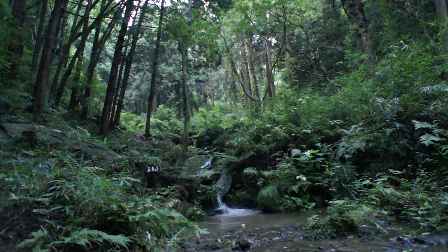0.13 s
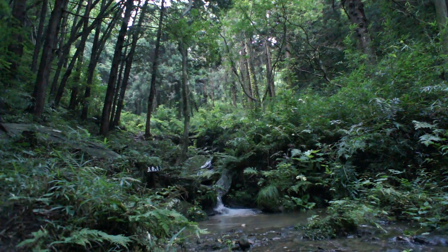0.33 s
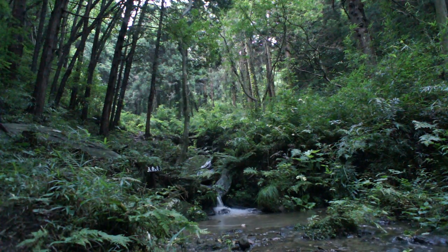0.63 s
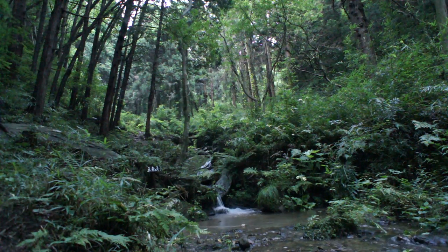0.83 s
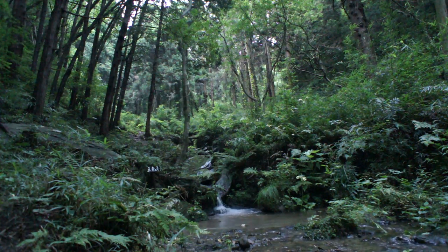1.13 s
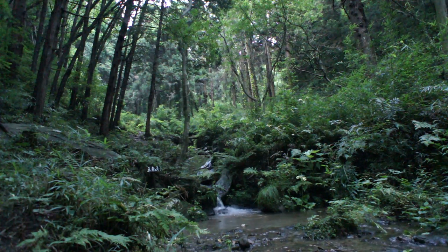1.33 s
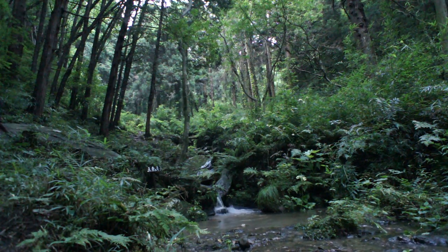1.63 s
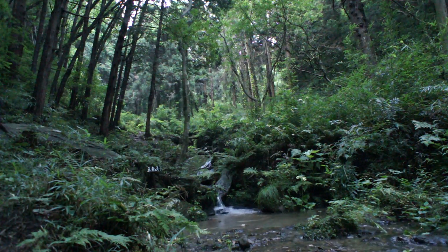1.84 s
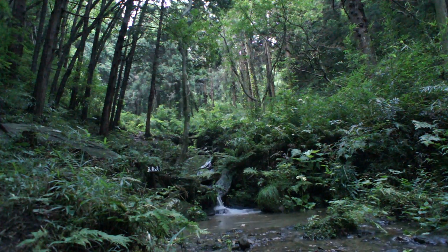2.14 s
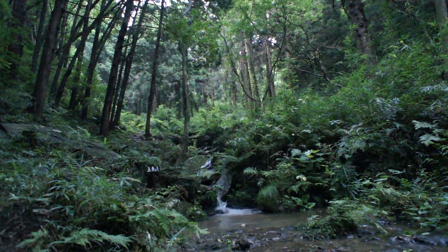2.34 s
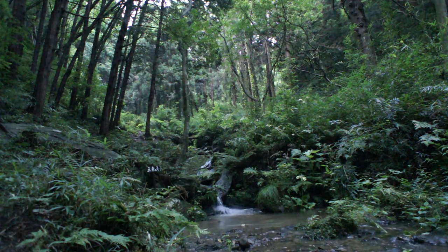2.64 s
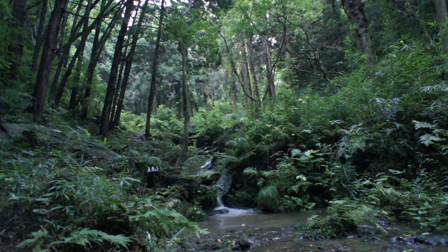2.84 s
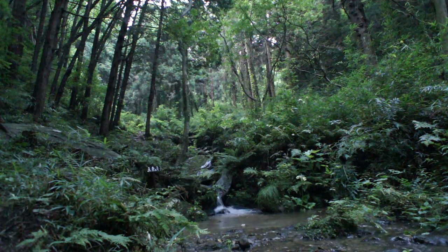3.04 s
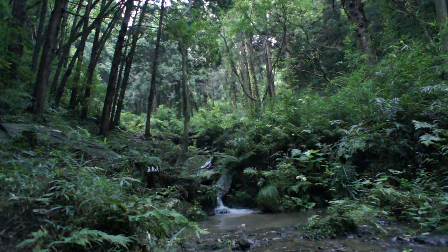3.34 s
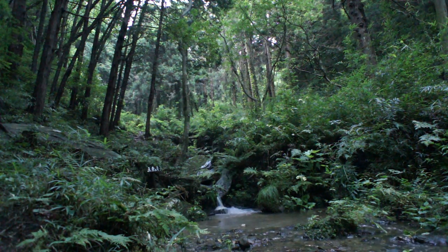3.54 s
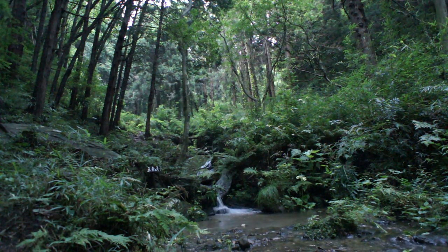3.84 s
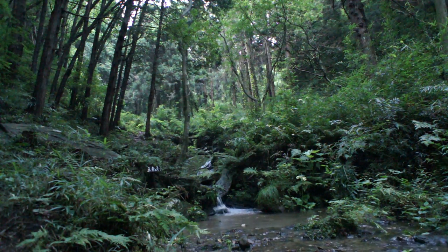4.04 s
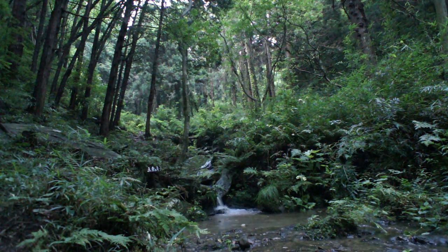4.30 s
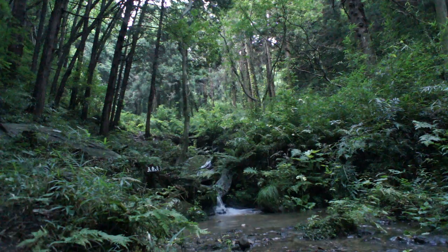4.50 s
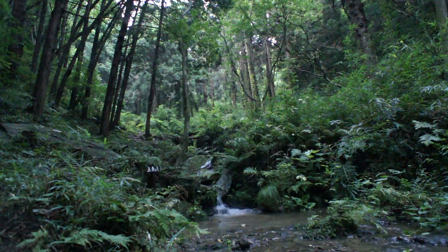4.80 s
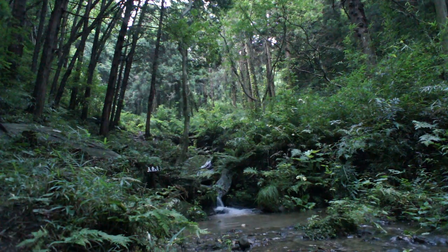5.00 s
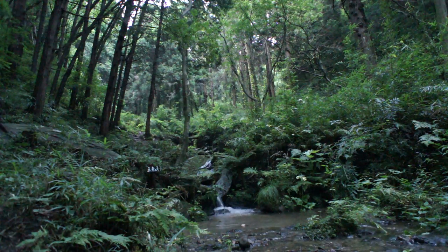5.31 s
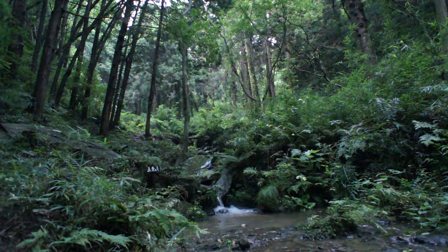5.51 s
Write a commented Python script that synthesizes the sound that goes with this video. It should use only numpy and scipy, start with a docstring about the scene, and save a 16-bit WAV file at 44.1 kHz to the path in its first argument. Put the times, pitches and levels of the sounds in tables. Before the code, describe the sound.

Overlapping high metallic cicada trills fade, then surge louder in a wooded ravine, above steady stream rush and occasional watery plops.

```python
"""Evening cicadas chirp in a forest ravine, over a small waterfall that drops into a pool.
Seven near ones each repeat a ringing harmonic note, most about seven times a second, slowing as they tire;
behind them a far chorus swells and the farthest insects blur into filtered noise with thin trills.
The trunks scatter the chirps as dense random echoes. The water is an even rush of shaped noise, with
bubbles that ring as decaying, rising sines and plops that add a short splash of noise."""
import sys
import numpy as np
from scipy import signal
from scipy.fft import rfft, irfft
from scipy.io import wavfile
from scipy.ndimage import uniform_filter1d

SR = 44100
rng = np.random.default_rng(int(sys.argv[2]) if len(sys.argv) > 2 else 0)


def wav_record(signal):
    """Record a signal, one row per channel, as 16-bit PCM in the file named by sys.argv[1]."""
    frames = np.transpose(np.atleast_2d(signal))
    bounded = np.clip(frames, -1, 1)
    # unit amplitude maps onto the largest positive 16-bit level
    quanta = np.round(bounded * 32767).astype(np.int16)
    wavfile.write(sys.argv[1], SR, quanta)


N = 249606
TIME = np.arange(N) / SR


def gain_of(db):
    """Amplitude ratio: 20 dB is a factor of ten."""
    return 10 ** (np.asarray(db) / 20)


def evened(x):
    """Normalization of power: scales to rms 1."""
    return x / np.sqrt(np.mean(x ** 2) + 1e-20)


def read(points, hz):
    """Interpolation of a spectrum along a logarithmic frequency axis."""
    f, value = np.transpose(points)
    return np.interp(np.log(hz + 1), np.log(f + 1), value)


def level(points):
    """Amplitude envelope: a curve of dB over time as a gain for every sample."""
    return gain_of(np.interp(TIME, *np.transpose(points)))


def add(mix, s, sound):
    """Superposition: adds a sound into the mix from time s on, cut at the ends of the mix."""
    start = round(s * SR)
    sound = sound[..., max(-start, 0):]
    part = mix[..., max(start, 0):][..., :sound.shape[-1]]
    part += sound[..., :part.shape[-1]]


def wander(t, rate):
    """Random modulation: straight lines between random values, rate of them a second."""
    return np.interp((t - t[0]) * rate, np.arange(8192), rng.standard_normal(8192))


def place(x, side_db, delay_ms):
    """Stereo localization: a point source differs in level and arrival time at two microphones."""
    left = np.roll(x, round(delay_ms * SR / 1000)) * gain_of(side_db / 2)
    right = x / gain_of(side_db / 2)
    return np.array([left, right])


def noise(spectrum, likeness, patchy_db, flicker_db):
    """Partly coherent stereo noise, its level modulated in small patches and over wide bands."""
    hop, window = 256, 1024
    frames, hz = N // hop + 5, np.fft.rfftfreq(window, 1 / SR)
    a, b, c, d, patches, flicker = rng.standard_normal((6, frames, len(hz)))
    patches = uniform_filter1d(patches, size=9, axis=0)  # over time
    patches = evened(uniform_filter1d(patches, size=8, axis=1))  # over frequency
    flicker = uniform_filter1d(flicker, size=2, axis=0)
    flicker = evened(uniform_filter1d(flicker, size=60, axis=1))
    same = np.clip(read(likeness, hz), -1, 1)
    left, other = a + 1j * b, c + 1j * d
    right = same * left + np.sqrt(1 - same ** 2) * other
    gain = gain_of(read(spectrum, hz) + patchy_db * patches + flicker_db * flicker)
    z = np.array([left, right]) * gain
    sound = signal.istft(z.swapaxes(1, 2), nperseg=window, noverlap=window - hop)[1]
    return evened(sound[:, :N])


def forest(x, t60, early_s, late_db):
    """Multiple scattering: near trunks echo at once, far ones leave a faint tail, unlike at each ear."""
    t = TIME[:SR]
    taps = rng.standard_normal((2, SR)) * (rng.random((2, SR)) < 3000 / SR)  # 3000 echoes per s
    early = np.exp(-t / early_s)
    late = gain_of(late_db - 60 * t / t60)
    taps *= early + late
    taps /= np.linalg.norm(taps, axis=1, keepdims=True)
    return signal.fftconvolve(np.atleast_2d(x), taps, axes=1)[:, :x.shape[-1]]


def deep_wood():
    """Incoherent summation: the farthest insects merge into a noise band with a few thin steady trills."""
    # Blur of countless cicadas. Each row: frequency in Hz, relative density in dB per Hz.
    blur = [(3400, -22), (3950, -0.5), (4300, -0.5), (4800, -15.5), (5600, -12), (6400, -8), (6900, -10.5),
            (7700, -4), (8050, 1.5), (8550, 3.5), (9050, -6.5), (9600, -15), (10500, -4), (11600, -51)]
    # Its level. Each row: time in seconds, level in dB.
    blur_level = [(0, -24), (.6, -23.5), (1.9, -26), (2.8, -25.5), (3.8, -24), (4.7, -22), (5.66, -22.5)]
    # Trills of other insects. Each row: frequency in Hz, width at half amplitude in Hz, level in dB.
    trill_bands = [(7142, 50, -55), (7466, 18, -51), (7585, 30, -48), (7660, 60, -49), (7910, 45, -45)]
    hz = np.fft.rfftfreq(N, 1 / SR)
    z = rfft(rng.standard_normal((2, N)))
    trills = np.zeros((2, N))
    for f, width, db in trill_bands:
        resonance = 1 / (1 + (2 * (hz - f) / width) ** 2)
        trills += gain_of(db) * evened(irfft(z * resonance, N))
    unlike = [(1000, 0)]  # no likeness of left and right at any frequency
    return trills + level(blur_level) * noise(blur, unlike, patchy_db=2.0, flicker_db=1.0)


def tymbal(t, hz, harmonics_db, jitter, buzz, click_hz):
    """Driven resonance: the abdomen rings in harmonics, kept going by the uneven buckling of its ribs."""
    phase = 2 * np.pi * np.cumsum(hz * (1 + jitter * wander(t, 700))) / SR
    click_phase = 2 * np.pi * np.cumsum(click_hz * (1 + .25 * wander(t, 150))) / SR
    ribs = 1 + buzz * np.cos(click_phase)
    phase = (phase % (2 * np.pi)).astype(np.float32)
    ring = sum(float(gain_of(db)) * np.sin((k + 1) * phase) for k, db in enumerate(harmonics_db))
    return evened(ribs * ring)


def far_chorus(count=18):
    """Asynchronous superposition: each cicada has its own pitch and tempo, heard only through the trees."""
    # Swell of the chorus. Each row: time in seconds, level in dB before the trim.
    swell = [(0.1, -24.5), (1.95, -30.5), (3.94, -24.5), (4.14, -22.5), (5.58, -22.5), (5.6, -21.5)]
    # Timbre of one voice: the relative levels of harmonics 1 to 5 in dB.
    voice_harmonics = [-9, -3, -13, -15.5, -16]
    trim_db = 1.73
    t = np.arange(N + SR // 2) / SR  # half a second of lead-in lets the echoes build up
    groups = np.zeros((3, len(t)))
    for k in range(count):
        spread = 2 * (k + rng.random()) / count - 1  # place within the range of pitches, -1 to 1
        tempo = rng.uniform(6.3, 7.9) * (1 + .05 * wander(t, 1))  # chirps per s
        beat = np.cumsum(tempo) / SR + rng.random()
        pull = np.maximum(np.sin((2 * np.pi * beat).astype(np.float32)), 0)
        hz = (2122 + 138 * spread) * (1 + .006 * wander(t, 1.5) + .014 * (pull - .8))
        song = tymbal(t, hz, voice_harmonics, jitter=0.00819, buzz=0.3, click_hz=220.2)
        groups[k % len(groups)] += gain_of(-7 * spread ** 2) * pull * song
    heard = sum(forest(group, t60=2.0, early_s=0.027, late_db=-11) for group in groups)
    return gain_of(trim_db) * level(swell) * evened(heard[:, -N:])


def bubble(hz, t60, rise):
    """Volume resonance: a trapped pocket of air rings and climbs in pitch as it nears the surface."""
    t = np.arange(0, t60, 1 / SR)
    onset = 1 - np.exp(-t * hz / 1.04)
    return gain_of(-60 * t / t60) * onset * np.sin(2 * np.pi * hz * (t + rise * t ** 2 / t60))


def splash(hz, t60, length=0.061):
    """Band-passed noise burst: the wet slap around and above a bubble's pitch as water closes over it."""
    t = np.arange(0, length, 1 / SR)
    band = signal.butter(2, [0.61 * hz, 1.95 * hz], "band", fs=SR, output="sos")
    spray = signal.sosfilt(band, rng.standard_normal(len(t)))
    return evened(spray) * (1 - np.exp(-t / 0.0025)) * gain_of(-60 * t / t60)


def lesser_plops(count=30):
    """Chance excitation: middling bubbles, one at a random moment in each slot, as (s, Hz, dB, t60 s)."""
    per_s, low_hz, high_hz = 5, 482, 987
    middle_db, spread_db = -26, 0.5
    cycles = 46  # each rings for this many cycles
    when, size, force = rng.random((count, 3)).T
    s = (np.arange(count) + when) / per_s
    hz = low_hz * (high_hz / low_hz) ** size
    db = middle_db + spread_db * (2 * force - 1)
    return list(np.transpose([s, hz, db, cycles / hz])[s < N / SR])


def waterfall(count=36):
    """Turbulence and bubble resonance: an even rush, small bubbles all the time, and single plops."""
    # Spectrum of the falling water. Each row: frequency in Hz, relative density in dB per Hz.
    rush_spectrum = [(25, -48), (55, -39), (85, -23), (200, -7.5), (350, -1.5), (650, -1), (1100, 1),
                     (1600, -1.5), (2700, -2.5), (5200, -3), (9500, -8), (11000, -17), (11700, -23.5),
                     (12300, -49)]
    # Coherence of the two channels. Each row: frequency in Hz, left-right likeness from 0 to 1.
    rush_likeness = [(30, .55), (100, 0.83), (400, 0.89), (800, 0.71), (1500, 0.48), (3000, 0.35),
                     (10000, 0.85)]
    # Largest bubbles in the pool. Each row: start in seconds, starting pitch in Hz,
    # level in dB before the bubble and splash offsets, t60 of the ring in seconds.
    large_plops = [(1.269, 591, -9.5, 0.041), (1.389, 563, -13.5, 0.023), (1.44, 358, -24, 0.19),
                   (1.543, 560, -19.5, 0.04), (2.133, 733, -16.5, 0.044), (2.617, 553, -23.5, .05),
                   (2.67, 1020, -22.5, 0.07), (2.845, 371, -31, 0.18), (3.385, 364, -30, 0.38),
                   (4.366, 553, -18, 0.034), (4.511, 583, -15.5, 0.057), (4.965, 573, -22, .07),
                   (5.501, 677, -9.5, 0.059), (5.618, 532, -16.5, 0.049), (5.628, 1086, -15.5, 0.027)]
    rush = gain_of(-25.5) * noise(rush_spectrum, rush_likeness, patchy_db=1.0, flicker_db=1.2)
    rush[0] = np.roll(rush[0], round(.00009 * SR))  # the water is a little nearer the right ear
    babble, plops = np.zeros(N), np.zeros(N)
    for hz in np.geomspace(400, 1800, count):
        births = rng.random(N) < 6 / SR  # about 6 per s at each pitch
        strength = gain_of(4.5 * np.minimum(rng.exponential(1, N), 3))
        babble += signal.oaconvolve(births * strength, bubble(hz, 18 / hz, rise=0.12))[:N]
    for s, hz, db, t60 in large_plops + lesser_plops():
        add(plops, s, gain_of(db + 2.0) * bubble(hz, t60, rise=0.084))
        add(plops, s, gain_of(db - 8.0) * splash(hz, t60=0.062))
    pool = gain_of(-41.5) * evened(babble) + plops
    echoes = forest(pool, t60=.4, early_s=0.018, late_db=-21)
    return rush + place(pool, 1.0, 0.042) + gain_of(-9.0) * echoes


def chirps(first, end, gap, slowing, top_hz, sag_hz_per_s, peak_s, peak_db, swell_db_per_s,
           fade_db_per_s, count=32):
    """Fatigue of a repeated call: rows (s, Hz, dB) swell and fade, slow down and sink in pitch."""
    spread_hz, spread_db = 6.07, 0.87  # chance differences from chirp to chirp
    k = np.arange(count)
    s = first + gap * k + slowing * k * (k - 1) / 2
    hz = top_hz - sag_hz_per_s * (s - first) + spread_hz * rng.standard_normal(count)
    swell = swell_db_per_s * np.maximum(peak_s - s, 0)
    fade = fade_db_per_s * np.maximum(s - peak_s, 0)
    db = peak_db - swell - fade + spread_db * rng.standard_normal(count)
    return np.transpose([s, hz, db])[s < end]


def near_cicadas():
    """Muscle-driven modulation: each chirp swells and fades while its pitch arches with the pull."""
    # Body and place of each cicada. Each row: relative levels of harmonics 1 to 5 in dB, chirp length in
    # seconds, left over right in dB, delay at the left ear in ms, direct sound in dB.
    bodies = { "tiring": ([-9, -2.5, -19, -5, -12], .055, 0, .02, -2.3), "mellow": ([-1.5, 1, -24, -4, -13],
              .07, 0, .05, -7.5), "brief": ([-13, -4, -14, -9, -16], .075, 1, .02, -1.5),
              "full": ([-6.5, 1, -22, -20, -24], 0.068, .5, .03, -2.5), "loud": ([-11, 11, -11, -13, -22],
              .075, 0.71, -.1, -2.5), "shrill": ([-7.5, -10, -4, 1.5, -8.5], 0.059, -0.88, -.07, 0),
              "high": ([-9, -6, -16, -5, -11.5], .06, 1, .05, -3), }
    # Rhythm of each cicada. Each row: middle of the first chirp in seconds, end of the phrase in seconds,
    # first gap between chirps in seconds, growth of each gap in seconds.
    rhythms = { "tiring": (.02, 2.4, .24, .025), "mellow": (.045, 1.8, .123, .0095),
               "brief": (1.66, 2.67, .153, .0005), "full": (2.8, 5.5, .124, .0026),
               "loud": (2.74, 5.64, .1302, .00035), "shrill": (2.7, 5.64, .131, .0004),
               "high": (.02, 2.82, .141, .0002), }
    # Effort of each cicada. Each row: pitch in Hz before the arch and chance spread, sag of the pitch
    # in Hz per second, loudest time in seconds, level there in dB before the spread, pull and direct
    # gain, swell before it in dB per second, fade after it in dB per second.
    efforts = { "tiring": (1978, 2, 0.2, -22.5, 13, 3), "mellow": (2177.5, 5.5, 0.3, -23, 5, 1),
               "brief": (2126, 2.5, 2.5, -28.5, 3, 1.5), "full": (2105.5, 9, 3.5, -17.5, 5.5, 5.5),
               "loud": (2218, 16, 4.65, -15, 9, 5.5), "shrill": (2180, 3, 6, -20, 3, 5),
               "high": (2322, 6, 1.2, -33.5, 12, 0), }
    out = np.zeros((2, N))
    for name in rhythms:
        harmonics_db, length, side_db, delay_ms, direct_db = bodies[name]
        t = np.arange(0, length, 1 / SR)
        pull = np.sin(np.pi * t / length)
        voice = np.zeros(N)
        for s, hz, db in chirps(*rhythms[name], *efforts[name]):
            arched_hz = hz * (1 + .014 * (pull - .8))
            note = tymbal(t, arched_hz, harmonics_db, jitter=.0075, buzz=.26, click_hz=220)
            add(voice, s - length / 2, gain_of(db) * pull ** 0.71 * note)
        out += gain_of(direct_db) * place(voice, side_db, delay_ms)
        out += gain_of(-2) * forest(voice, t60=.9, early_s=.017, late_db=-18)
    return out


def scene():
    """Linear superposition of the cicadas near and far and the waterfall."""
    return near_cicadas() + far_chorus() + deep_wood() + waterfall()


def record(dry):
    """Band limiting: the microphone cuts the bass and the recorder the highest treble."""
    bass_cut = signal.butter(4, 76, "high", fs=SR, output="sos")
    thin = signal.sosfilt(bass_cut, dry)
    treble_cut = signal.firwin(255, 12100, window=("kaiser", 9), fs=SR)  # edge in Hz
    return signal.oaconvolve(thin, treble_cut[None], "same")


dry = scene()
out = record(dry)
wav_record(out)
```